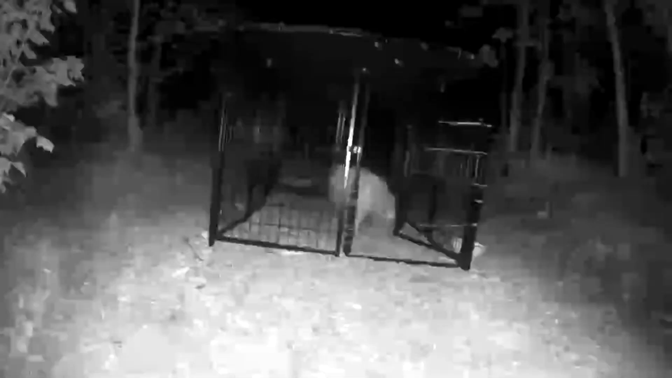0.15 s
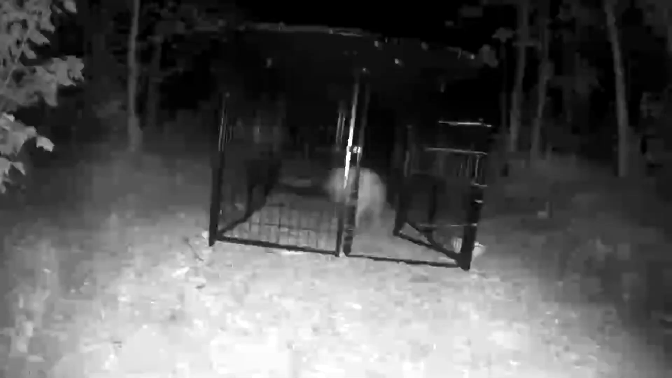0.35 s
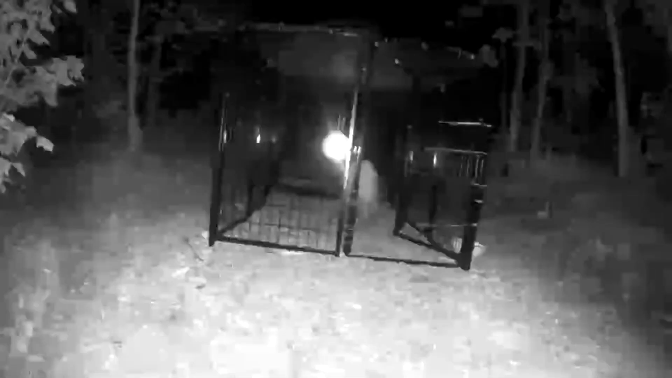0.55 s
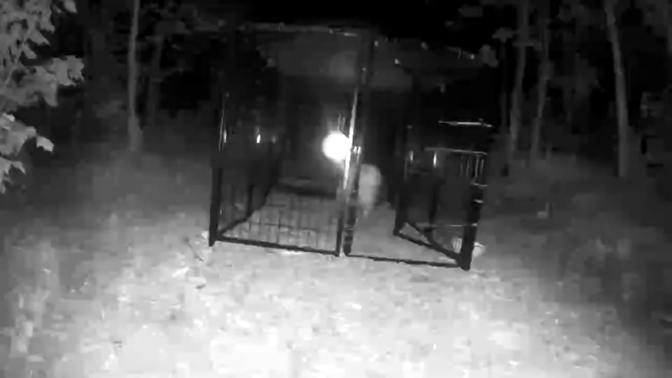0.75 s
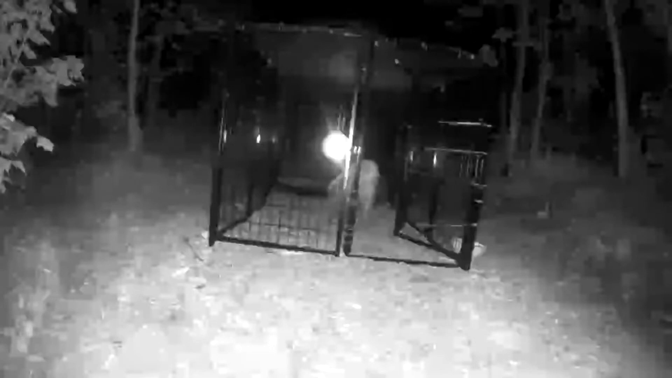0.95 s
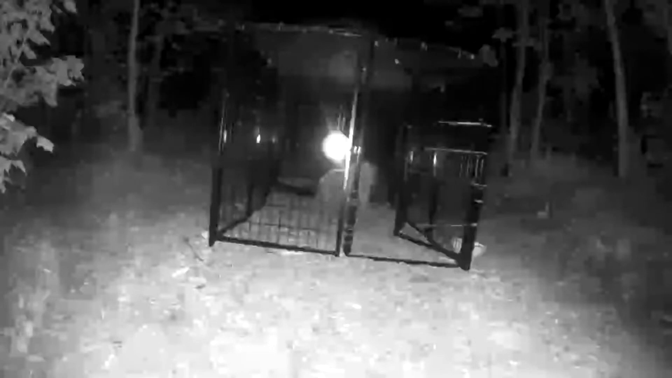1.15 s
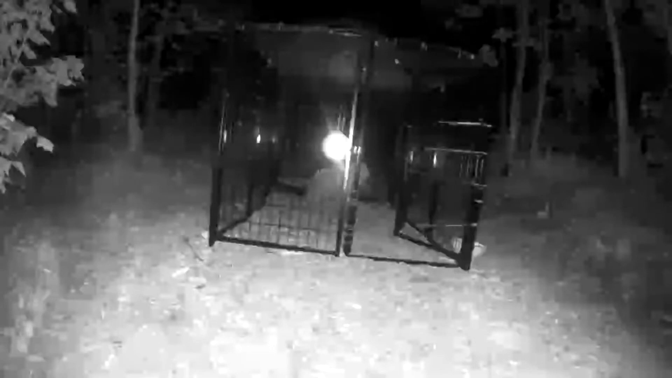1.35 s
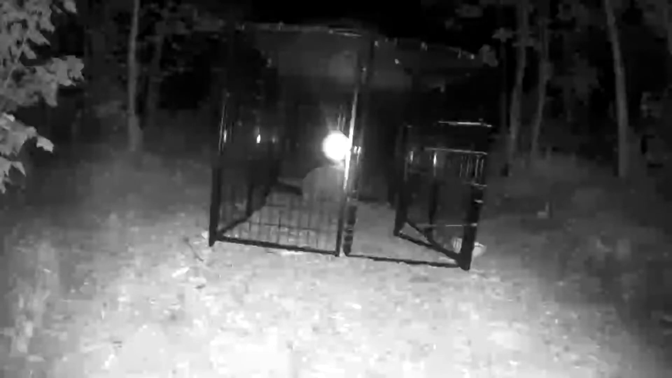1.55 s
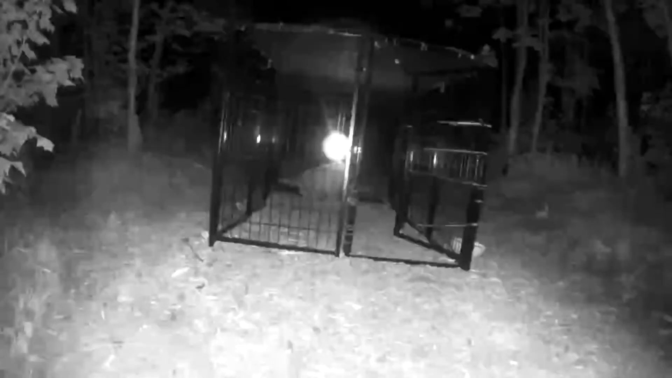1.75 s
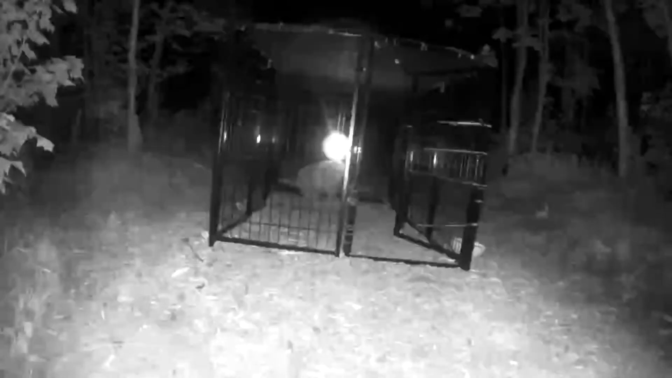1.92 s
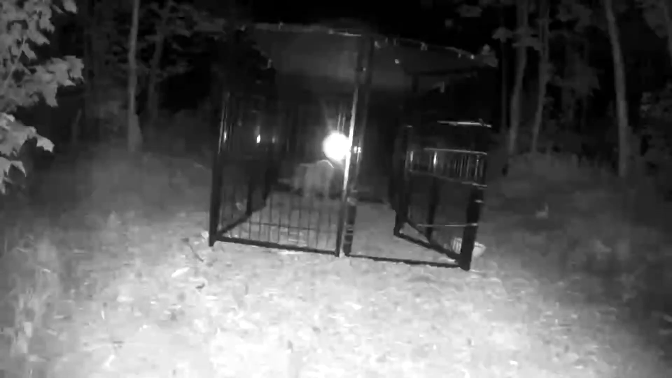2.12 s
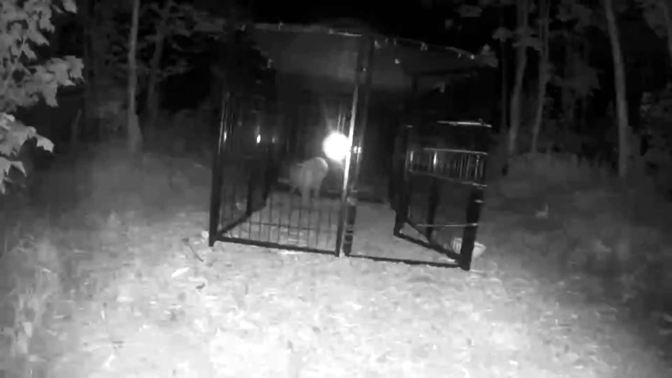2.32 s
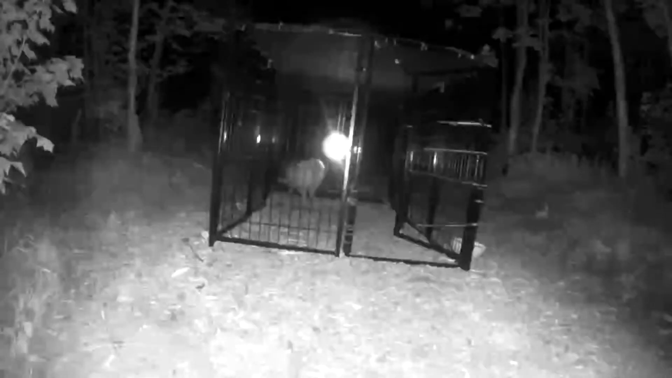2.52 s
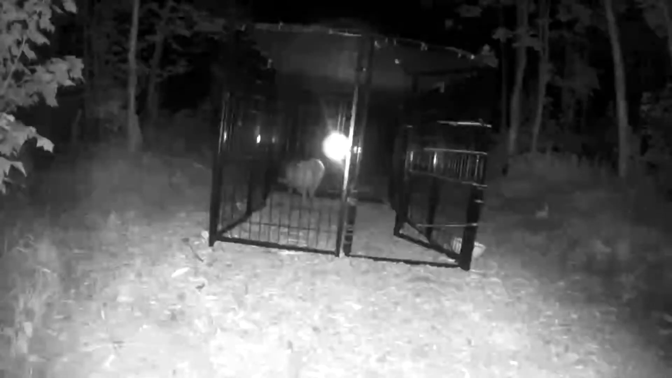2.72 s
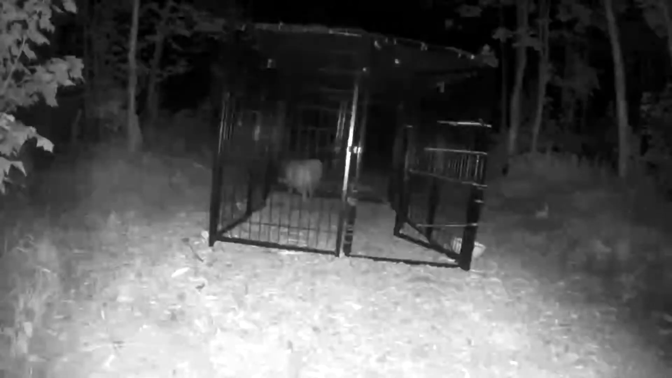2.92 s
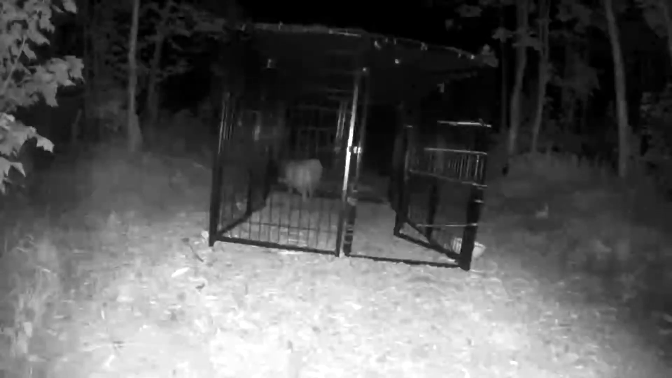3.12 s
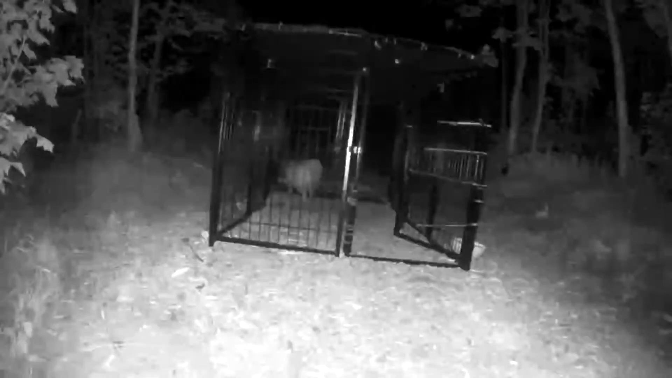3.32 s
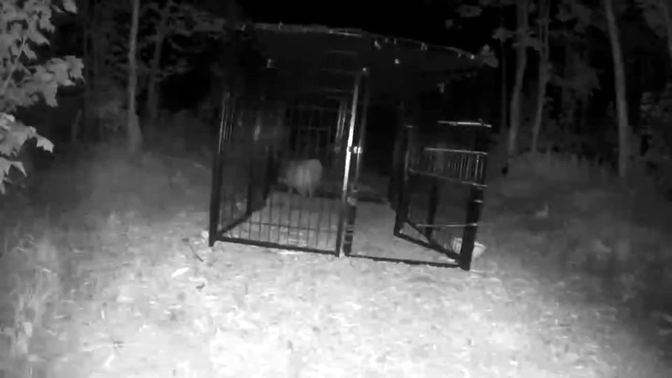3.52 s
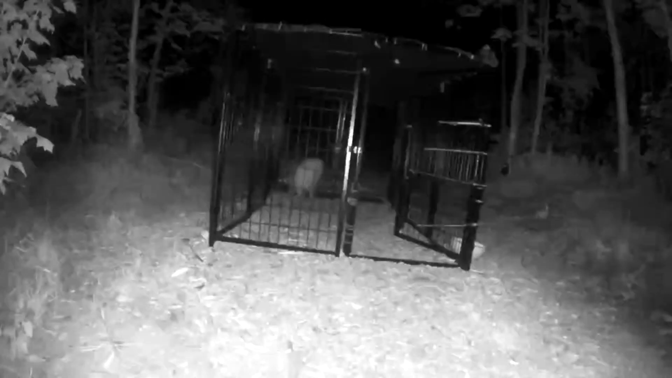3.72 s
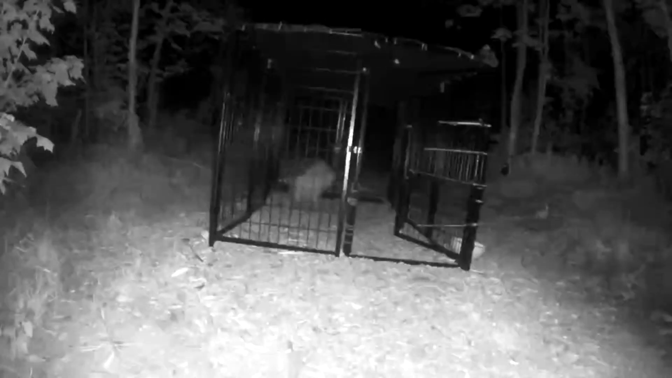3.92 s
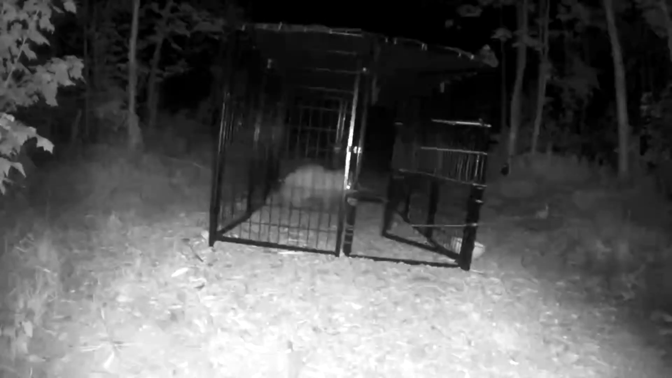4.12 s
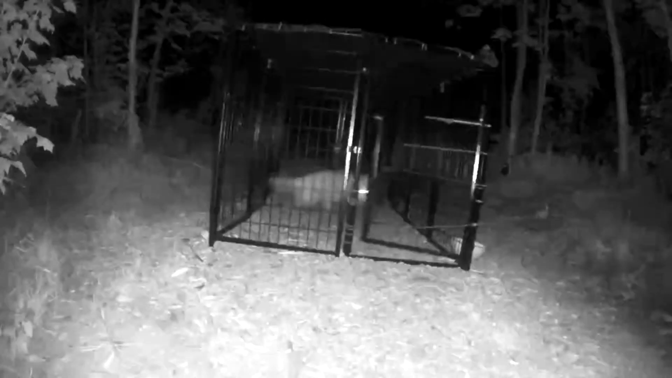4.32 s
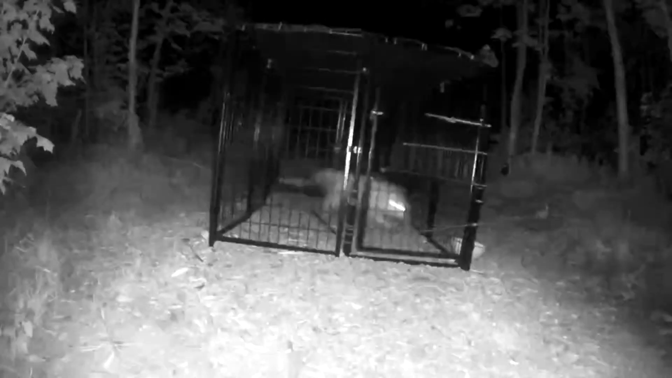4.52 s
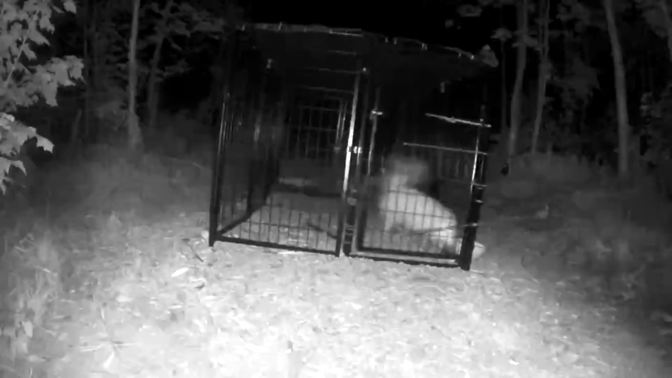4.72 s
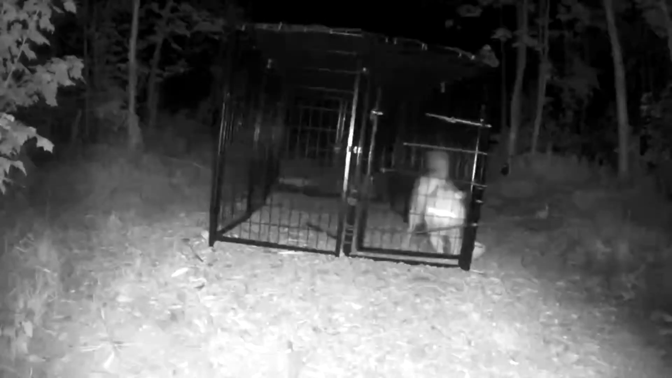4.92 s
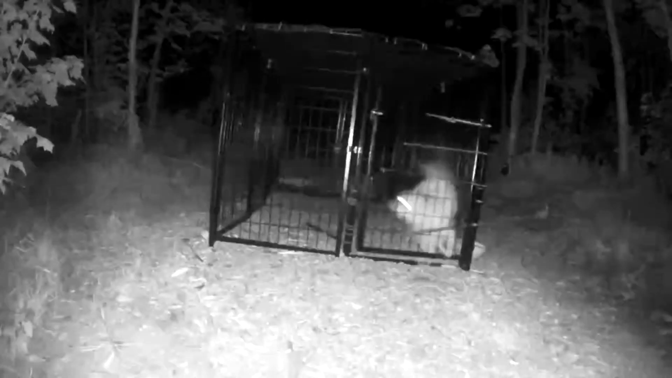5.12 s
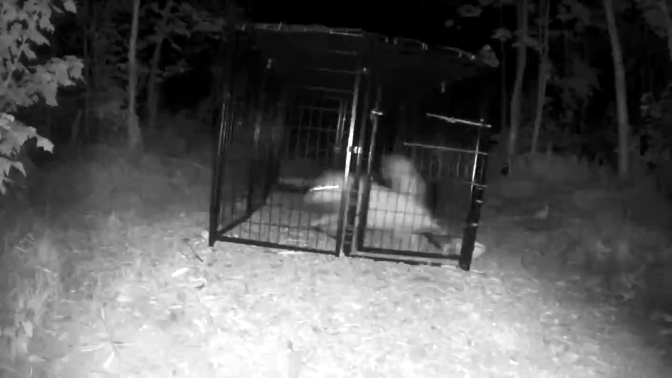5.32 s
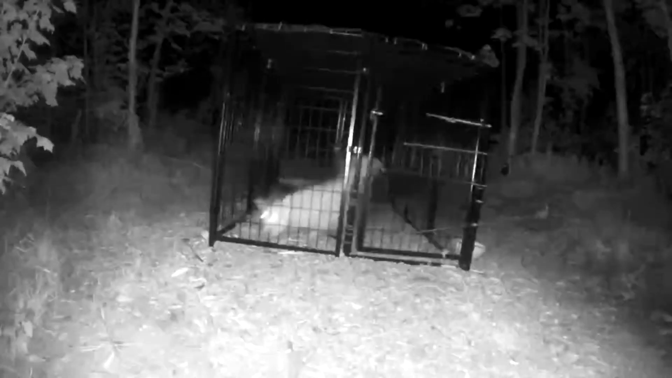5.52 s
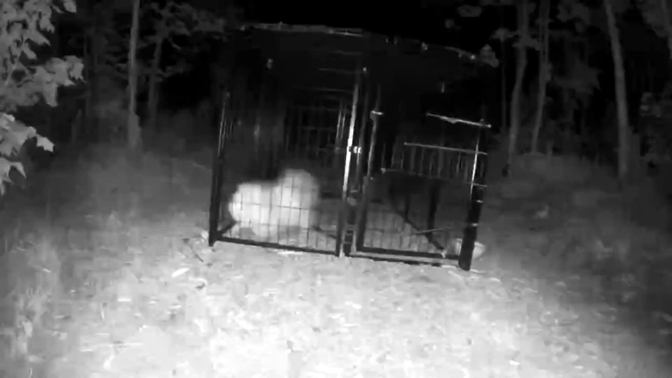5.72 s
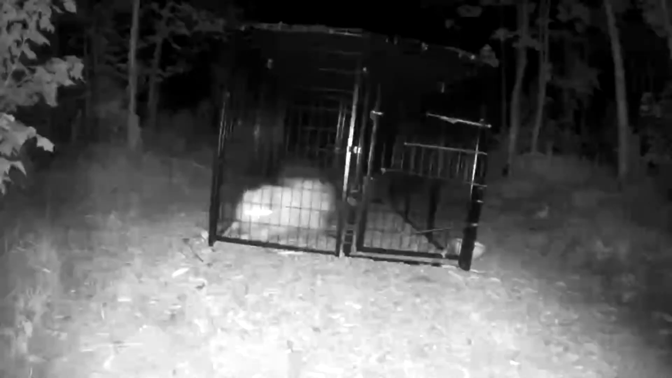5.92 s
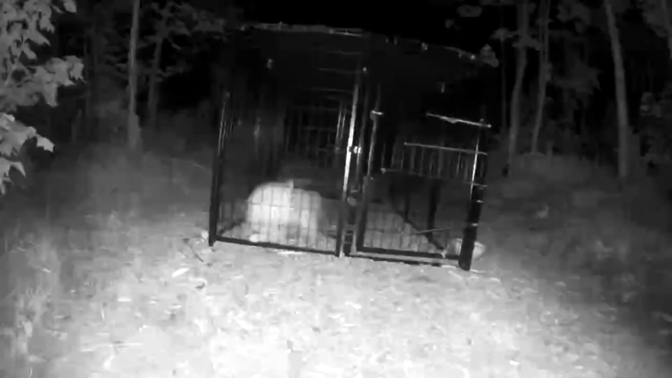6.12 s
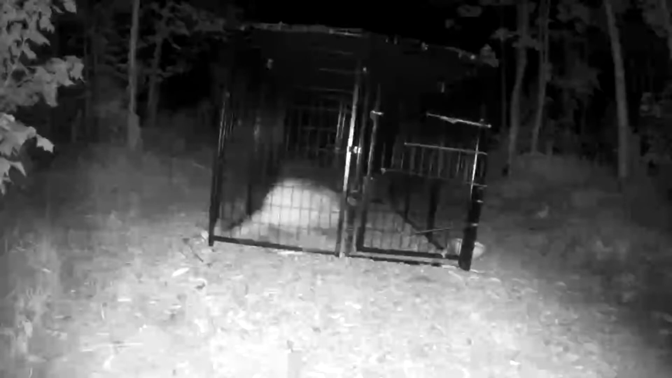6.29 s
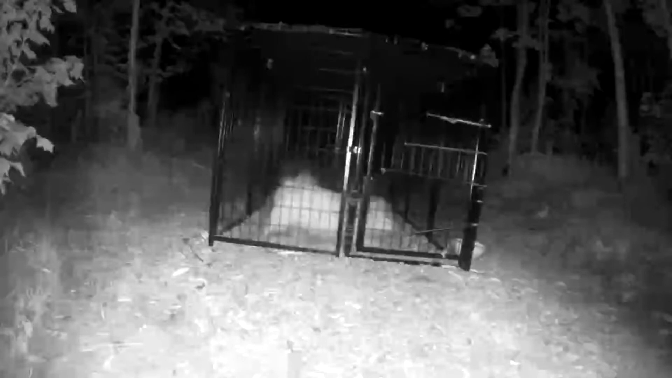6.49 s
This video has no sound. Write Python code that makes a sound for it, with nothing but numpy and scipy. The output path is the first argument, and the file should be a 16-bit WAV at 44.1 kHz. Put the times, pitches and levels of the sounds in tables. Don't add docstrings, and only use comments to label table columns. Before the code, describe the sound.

For the first 3.4 seconds the night wood is quiet: a steady, fast cricket trill, a flatter band of distant insects, soft hiss, mains hum and a faint low drone, with barely felt dull thumps near 2.8 and 3.3. From about 3.5 come faint metal ticks and light paw scuffs in litter. At 4.2 a bright wire ping and soft thuds lead into a hard steel slam at 4.3, bouncing at once. Dense, bright mesh rattling and frame clanks run until about 5.1, with a sharp crash near 4.87. A brief lull at 5.25 is followed by a clank at 5.4, a heavier knock at 5.6, singing wire pings around 5.7, and clatters at 5.9 and 6.05 to 6.15. Paw thumps continue beneath, and weaker rattles end near 6.5. The close-sounding, bright microphone ducks the crickets during the din; a slight echo returns from trees.

```python
import sys
import numpy as np
from scipy import signal
from scipy.fft import rfft, irfft
from scipy.io import wavfile
from scipy.ndimage import uniform_filter1d, map_coordinates

SR = 44100
rng = np.random.default_rng(int(sys.argv[2]) if len(sys.argv) > 2 else 0)


def invert_db(x):
    u = np.asarray(x, float) / 20
    return 10 ** u


def persist_wave(psi):
    counts = np.round(np.clip(psi, -1, 1) * 32767).astype(np.int16)
    wavfile.write(sys.argv[1], SR, np.atleast_2d(counts).T)


N = 288855
START = round(3.4 * SR)

# pitch_hz [Hz], level_db [dB per Hz]
NIGHT_COLOUR = [(12, -33), (20, -14), (75, -16.5), (121, -10), (190, -16.5), (306, -21), (413, -25),
                (966, -21.5), (1570, -22), (2140, -23), (3300, -26.5), (4800, -17), (5700, -21),
                (7200, -24)]
# pitch_hz [Hz], level_db [dB rms]
HUM_LINES = [
    (120, -65.5),
    (240, -77),
    (360, -76),
    (7495, -102.5),
]
# start_s [s], level_db [dB]
HUM_FADE = [(4.19, 8.5), (4.3, -10.5), (4.7, 4.5), (5.2, 2.5), (5.8, 8.5), (6.0, 6.5), (6.2, -9), (6.55, 1)]
# start_s [s], rate_hz [wing strokes per s]
WING_STROKES = [(0.0, 55.3), (4.0, 55.2)]
# start_s [s], peak_db [dB], pitch_hz [Hz]
THUDS = [(2.769, -45, 38), (3.259, -46, 33), (3.669, -52, 80), (4.212, -35.5, 196), (4.228, -39, 153),
         (4.231, -35.5, 103), (5.432, -46, 90), (5.641, -37.5, 88), (6.096, -37, 98), (6.36, -41, 100)]
# start_s [s], tread_db [dB], litter_db [dB above the tread]
STEPS = [(3.605, -72.5, 11.5), (3.69, -52, -25), (4.02, -59.5, -3), (4.19, -59, -15), (4.24, -58, 7),
         (4.38, -57.5, 0), (4.54, -55, 3.5), (4.65, -56.5, 3.5), (4.78, -57.5, -0.5), (4.92, -61, -1.5),
         (5.06, -61, -11), (5.22, -57.5, -6.5), (5.35, -56.5, -1), (5.44, -52, 0), (5.55, -51.5, -5),
         (5.67, -56.5, -7.5), (5.79, -52.5, -6.5), (5.96, -49, -2), (6.13, -50.5, -7), (6.25, -60, -3),
         (6.38, -63, -5), (6.5, -57.5, -9)]
# pitch_hz [Hz], level_db [dB per Hz]
STEEL_COLOUR = [(600, -8), (1170, 0), (1600, -5), (3900, -8), (4650, 1), (5600, -2), (6450, 3), (7500, -6)]
# low_hz [Hz], high_hz [Hz], t60_s [s]
CAGE_PARTS = [
    (5800, 7600, 0.032),
    (3436, 5600, 0.2),
    (1600, 3500, 0.018),
    (630, 1600, 0.11),
]
# [dB, door pushed]
PART_REACH = [
    (-2.5, -4),
    (-6.5, -8.5),
    (-12, 2.5),
    (-17, -4.5),
]
NEIGHBOURS = [(.87, .45), (.94, -.7), (1, 1), (1.05, -.7), (1.13, .5)]
# start_s [s], effort_db [dB], where [0 mesh to 1 door]
STRUGGLE = [(3.5, -65.5, .5), (3.95, -58.5, 0.34), (4.12, -50, 0.22), (4.2, -46, 1), (4.39, -38, 0.14),
            (4.54, -32, 0.23), (4.71, -32.5, 0.22), (4.83, -38.5, 0.077), (5.08, -44, 0.15),
            (5.3, -46, 0.33), (5.55, -41, 0.59), (5.66, -38.5, 0.76), (5.77, -45, 0.95),
            (5.91, -48.5, 0.33), (6.07, -43, 0.78), (6.2, -42, 0.5), (6.33, -49, 0.15), (6.55, -51.5, .6)]
# start_s [s], force_db [dB], pitch_hz [Hz, loudest ring], dies_s [s, chatter t60]
MESH_BLOWS = [(4.159, -25.5, 6780, 0.33), (4.2324, -25, 5590, 0.052), (4.3644, -22.5, 6040, 0.088),
              (4.4213, -20.5, 6750, 0.11), (4.559, -24.5, 6750, .15), (4.6956, -29, 6130, .091),
              (4.7584, -27, 6100, 0.069), (4.8653, -13.5, 6970, 0.088), (4.9488, -20.5, 6130, 0.047),
              (5.0376, -24.5, 6080, 0.099), (5.1158, -29.5, 6940, .061), (5.2445, -54, 6900, .1),
              (5.3, -58.5, 7100, .079), (5.5913, -24, 6790, 0.078), (5.913, -29.5, 4710, 0.22),
              (6.0826, -29.5, 4800, 0.23), (6.4445, -41, 6500, 0.078)]
MESH_SHOVES = [(3.7394, -47, 5900, 0.065), (3.8194, -49, 4280, 0.077), (3.91, -47, 4670, 0.12),
               (3.9844, -42, 4960, 0.061), (4.0924, -31, 6850, 0.059), (4.2635, -23.5, 6200, 0.066),
               (4.3444, -24.5, 6900, 0.11), (4.3774, -20.5, 6750, .094), (4.4553, -26, 6300, 0.21),
               (4.5044, -21.5, 6800, 0.12), (4.5294, -23.5, 6800, 0.26), (4.5994, -30, 6440, 0.17),
               (4.633, -21, 5410, 0.051), (4.8458, -19.5, 6660, 0.064), (5.019, -30, 4200, 0.11),
               (5.1594, -34, 3480, 0.056), (5.3848, -34.5, 6850, 0.27), (5.456, -35, 6760, .16),
               (5.5373, -37, 5400, .074), (5.6504, -31.5, 4830, 0.33), (5.745, -35, 4400, 0.15),
               (6.047, -20, 4770, 0.09), (6.115, -24.5, 4720, 0.092), (6.1383, -26, 5380, 0.11),
               (6.4314, -29.5, 6160, 0.14)]
FRAME_BLOWS = [(3.552, -45, 1330, .08), (3.601, -43, 1294, .061), (3.751, -43.5, 1560, 0.19),
               (4.095, -42.5, 2160, .08), (4.232, -38, 1370, 0.069), (4.329, -35, 1876, 0.24),
               (4.51, -31.5, 2210, 0.5), (4.559, -28, 1990, 0.056), (4.692, -42.5, 1130, 0.13),
               (5.245, -58, 2640, 0.053), (5.409, -31, 1904, 0.67), (5.459, -37.5, 1180, 0.38),
               (5.87, -36.5, 1096, 0.28), (5.912, -25.5, 1780, 0.33), (6.084, -31, 1980, 0.09),
               (6.2, -46.5, 1130, 0.48), (6.33, -50, 1150, 0.77)]
BAR_KNOCKS = [(3.603, -44, 2300, .05), (4.158, -38.5, 2650, .16), (4.189, -32.5, 2840, .11),
              (4.422, -27, 2820, 0.029), (4.759, -35.5, 3020, .08), (4.848, -37, 2960, .074),
              (4.865, -29.5, 3250, 0.075), (5.021, -37.5, 2980, 0.1), (5.037, -32, 3100, 0.22),
              (5.118, -37, 3460, 0.23), (5.396, -31, 2090, 0.19), (5.704, -31, 3040, 0.19),
              (6.056, -41, 2770, .058), (6.436, -39.5, 3300, 0.32)]
SLAM_MESH = [(4.2878, -17.5, 6320, 0.042), (4.2985, -15.5, 6040, 0.049), (4.3065, -18, 6800, 0.045),
             (4.3186, -24.5, 6000, 0.08)]
SLAM_FRAME = [(4.289, -13.5, 2330, 0.028), (4.3, -20.5, 2750, 0.046), (4.319, -33, 1780, 0.014),
              (4.364, -18.5, 3090, 0.018), (5.589, -19.5, 2360, 0.037)]
WIRE_STRIKES = [(4.0554, -36.5, 7010, .11), (4.1892, -20, 5310, 0.17), (5.6004, -24, 4620, 0.06),
                (5.6993, -22, 4580, 0.085), (5.7119, -26, 4840, .11), (5.7223, -28, 4680, 0.15)]


def rms_one(x):
    return x / np.sqrt(np.mean(x ** 2) + 1e-20)


def in_time(rows):
    s, *columns = np.transpose(rows)
    return [np.interp(np.arange(N) / SR, s, column) for column in columns]


def at_hz(points, hz):
    table = np.array(points)
    return np.interp(np.log(hz), np.log(table[:, 0]), table[:, 1])


def drift(rate_hz):
    knots = rng.standard_normal(400)
    return map_coordinates(knots, [np.arange(N) / SR * rate_hz], order=3, mode="wrap")


def band(x, low_hz, high_hz):
    return signal.sosfilt(signal.butter(2, [low_hz, high_hz], "band", fs=SR, output="sos"), x + 1e-18)


def night():
    t = np.arange(N) / SR
    hz = np.fft.rfftfreq(N, 1 / SR) + 1
    hiss = irfft(rfft(rng.standard_normal(N)) * invert_db(at_hz(NIGHT_COLOUR, hz)), N)
    hum = 0
    for pitch_hz, level_db in HUM_LINES:
        level = np.sqrt(2) * invert_db(level_db + 0.37 * drift(3.5))
        hum = hum + level * np.sin(2 * np.pi * pitch_hz * t + 0.54 * drift(5))
    drone = invert_db(-61.5 + 3.2 * drift(12)) * np.sin(2 * np.pi * 55.5 * t + 0.33 * drift(2.5))
    return invert_db(-55) * rms_one(hiss) + invert_db(in_time(HUM_FADE)[0]) * hum + drone


def crickets():
    stroke = np.cumsum(in_time(WING_STROKES)[0] + .4 * drift(2.1)) / SR % 1
    on = np.clip(stroke / 0.48, 0, 1)
    hz = 4450 - 380 * on + 40 * drift(50)
    near = np.sin(np.pi * on) * np.sin(2 * np.pi * np.cumsum(hz) / SR) * invert_db(0.74 * drift(30))
    far_band = signal.butter(4, [4150, 5380], "band", fs=SR, output="sos")
    blur = signal.sosfilt(far_band, rng.standard_normal(N))
    middle = band(rng.standard_normal(N), 4790, 5060)
    far = invert_db(-58.5) * rms_one(blur) + invert_db(-60.5) * rms_one(middle)
    return invert_db(-53.5) * near + far * invert_db(0.54 * drift(45))


def falls():
    out, t = np.zeros(N + SR), np.arange(SR // 4) / SR
    shape = (t / 0.0093) * np.exp(1 - t / 0.0094)
    for s, peak_db, hz in THUDS:
        at = round(s * SR)
        out[at:at + len(t)] += invert_db(peak_db - 4.5) * np.sin(2 * np.pi * hz * t) * shape
    return out[:N]


def steps():
    rise_s, dies_s = 0.029, 0.08
    s, deep_db, litter_db = np.transpose(STEPS)
    since = np.arange(START, N) / SR - s[:, None]
    weight = np.exp(-np.maximum(-since / rise_s, since / dies_s))
    tread = invert_db(0.83 * drift(18)) * rms_one(band(rng.standard_normal(N), 35, 105))
    litter = band(band(rng.standard_normal(N), 110, 600), 110, 600)
    scuffle = invert_db(3.6 * drift(30)) * rms_one(litter)
    out = np.zeros(N)
    out[START:] += tread[START:] * (invert_db(deep_db) @ weight)
    out[START:] += scuffle[START:] * (invert_db(deep_db + litter_db) @ weight)
    return out


def ring(x, hz, t60):
    r, w = invert_db(-60 / (t60 * SR)), 2 * np.pi * hz / SR
    return signal.lfilter([0, np.sin(w)], [1, -2 * r * np.cos(w), r * r], x + 1e-18)


def contacts(per_s, spread_db, count=N):
    chance, size = rng.random(count), rng.exponential(1, count)
    sign = rng.choice([-1, 1], count)
    return rms_one((chance < per_s / SR) * invert_db(spread_db * np.minimum(size, 4)) * sign)


def blows(table, equal_hz, db_per_octave, note_db, note_t60, part_db, swell, crack):
    force, notes, t = np.zeros((2, N + SR)), np.zeros(N + SR), np.arange(SR // 2) / SR
    for s, force_db, hz, dies in table:
        chatter = contacts(7000, spread_db=1.5, count=len(t))
        chatter *= invert_db(-60 * t / max(dies, .005)) + crack * np.exp(-t / .002)
        chatter[0] += 4.5 * crack
        chatter *= 1 - np.exp(-(t + 1 / SR) / swell)
        at = round(s * SR)
        upper = invert_db(db_per_octave * np.log2(hz / equal_hz))
        shares = np.array([[upper], [1]]) / np.hypot(upper, 1)
        force[:, at:at + len(t)] += chatter * invert_db(part_db + force_db) * shares
        note = sum(share * ring(chatter, hz * ratio, note_t60) for ratio, share in NEIGHBOURS)
        notes[at:at + len(t)] += invert_db(force_db + note_db) * note / np.max(np.abs(note))
    return force[:, :N], notes[:N]


def steel(force, low_hz, high_hz, t60, bare, shift_db):
    driven = np.concatenate([rng.standard_normal(8000), np.zeros(8000), force])
    jitter = (high_hz / low_hz) ** (rng.uniform(-.3, .3, 24) / 24)
    pitches = np.geomspace(low_hz, high_hz, num=24) * jitter
    rings, knots = 0, np.arange(0, len(driven), 2500)
    for k, hz in enumerate(pitches):
        spot_db = shift_db * rng.standard_normal(len(knots))
        spot = invert_db(np.interp(np.arange(len(driven)), knots, spot_db))
        rings = rings + invert_db(at_hz(STEEL_COLOUR, hz)) * (-1) ** k * ring(driven * spot, hz, t60)
    contact = band(band(driven, low_hz, high_hz), low_hz, high_hz)

    def unit_gain(v):
        return v[16000:] / np.std(v[2000:8000])

    return np.sqrt(1 - bare) * unit_gain(rings) + np.sqrt(bare) * unit_gain(contact)


def cage():
    mesh, mesh_notes = blows(MESH_BLOWS + SLAM_MESH, 5300, 20, note_db=-1.5, note_t60=0.044,
                             part_db=-5, swell=0.00013, crack=0.88)
    shove, shove_notes = blows(MESH_SHOVES, 5300, 20, note_db=-7.0, note_t60=0.041,
                               part_db=0.5, swell=0.0064, crack=0)
    frame, frame_notes = blows(FRAME_BLOWS, 1400, 9, note_db=-3, note_t60=0.028,
                               part_db=-9, swell=0.00024, crack=1.0)
    bars, bar_notes = blows(BAR_KNOCKS, 1300, 16, note_db=2.0, note_t60=0.015,
                            part_db=-11.5, swell=0.00025, crack=0.36)
    slam, slam_notes = blows(SLAM_FRAME, 1300, 8, note_db=-11, note_t60=0.047,
                             part_db=-6.5, swell=0.00022, crack=0.84)
    wire, wire_notes = blows(WIRE_STRIKES, 5300, 20, note_db=5.5, note_t60=0.024,
                             part_db=-6.5, swell=0.000091, crack=1.0)
    clumps = invert_db(1.6 * drift(40) + .5 * drift(14))
    effort_db, where = in_time(STRUGGLE)
    out = mesh_notes + shove_notes + frame_notes + bar_notes + slam_notes + wire_notes
    forces = [*(mesh + shove + wire), *(frame + bars + slam)]
    for force, (mesh_db, door_db), part in zip(forces, PART_REACH, CAGE_PARTS):
        level_db = effort_db + mesh_db + where * (door_db - mesh_db)
        force = force + invert_db(level_db) * clumps * contacts(5000, spread_db=2.0)
        out[START:] += steel(force[START:], *part, bare=0.64, shift_db=2.5)
    return out


def ducking(loud, above_db, share, back_db_per_s):
    level_db = 10 * np.log10(uniform_filter1d(loud ** 2, size=1024) + 1e-12)
    ramp = back_db_per_s * np.arange(N) / SR
    held_db = np.maximum.accumulate(level_db + ramp) - ramp
    return invert_db(-share * uniform_filter1d(np.maximum(held_db - above_db, 0), size=1024))


def scene():
    background = night() + crickets()
    ground = falls() + steps()
    trap = cage()
    echo = np.roll(trap, round(0.028 * SR)) * invert_db(-15)
    gain = ducking(trap, above_db=-31.5, share=0.093, back_db_per_s=5.4)
    mono = trap + echo + ground + gain * background
    return np.array([mono, mono])


def roll_off(x):
    return signal.sosfilt(signal.butter(12, 8230, fs=SR, output="sos"), x)


def record(dry):
    droop = signal.sosfilt(signal.butter(6, 7100, fs=SR, output="sos"), dry)
    cut = signal.sosfilt(signal.ellip(9, 1, 70, 7435, fs=SR, output="sos"), droop)
    return roll_off(cut)


dry = scene()
out = record(dry)
persist_wave(out)
```